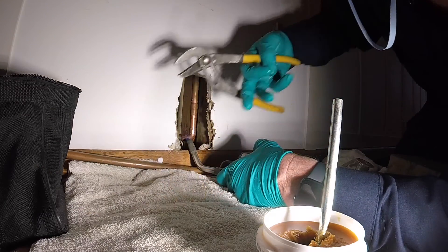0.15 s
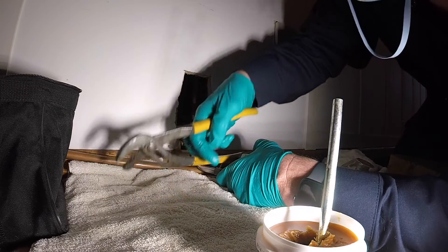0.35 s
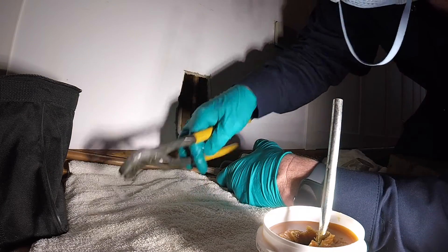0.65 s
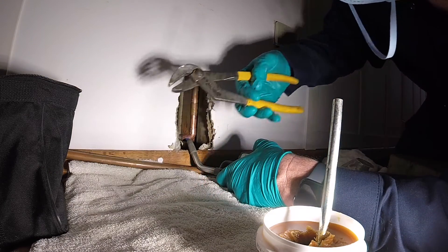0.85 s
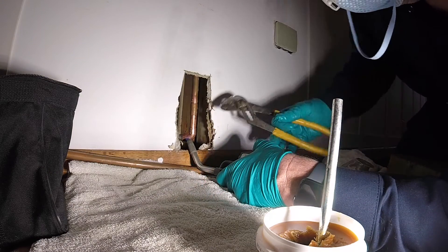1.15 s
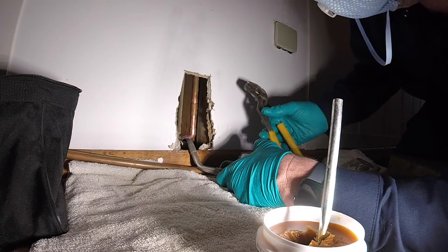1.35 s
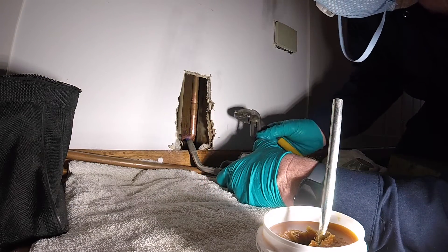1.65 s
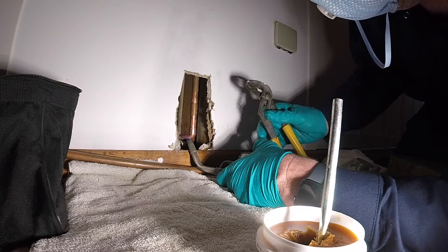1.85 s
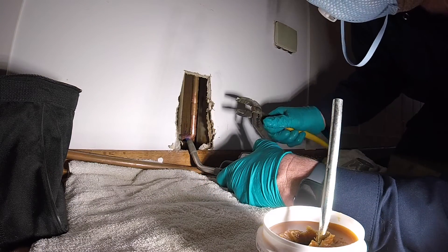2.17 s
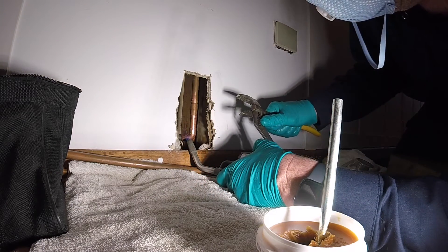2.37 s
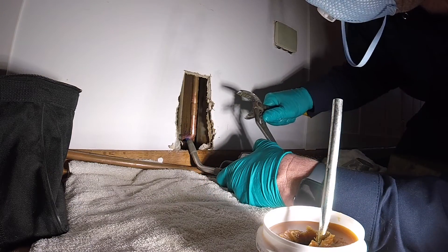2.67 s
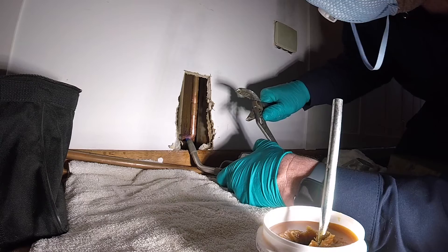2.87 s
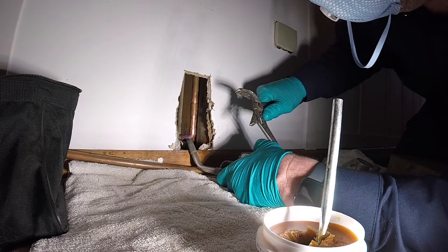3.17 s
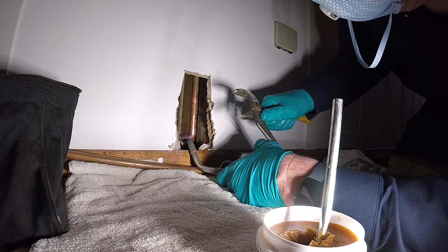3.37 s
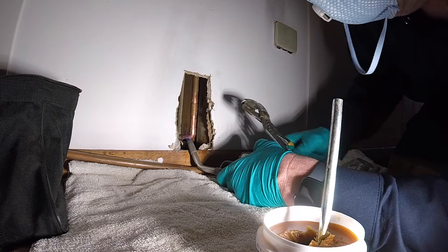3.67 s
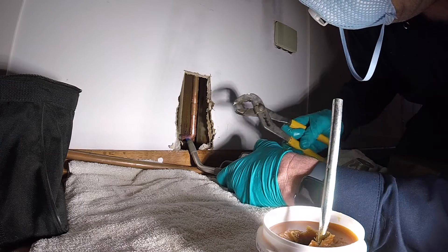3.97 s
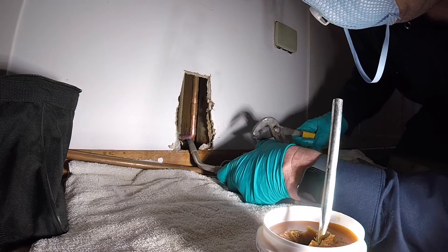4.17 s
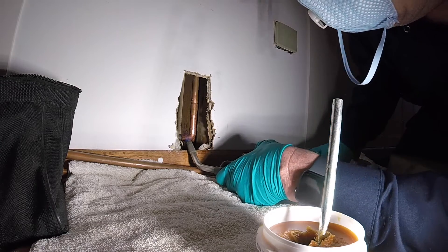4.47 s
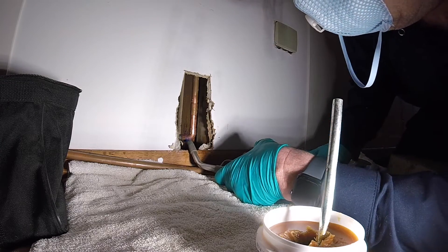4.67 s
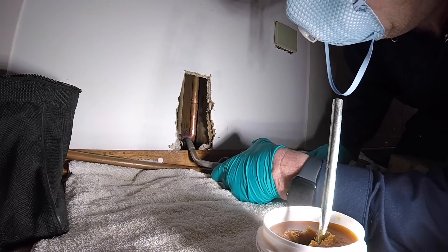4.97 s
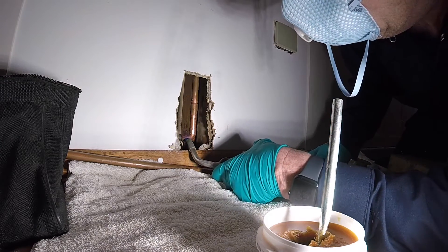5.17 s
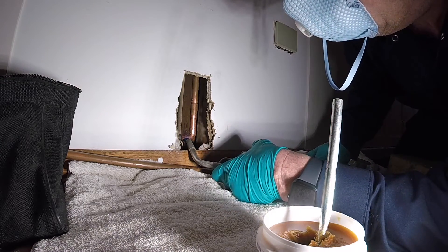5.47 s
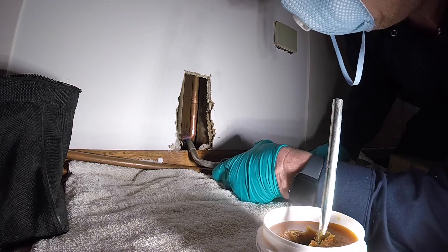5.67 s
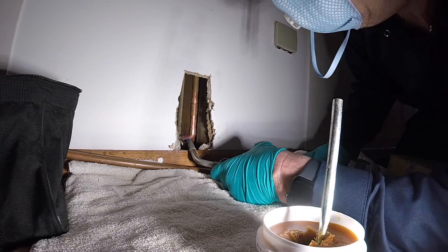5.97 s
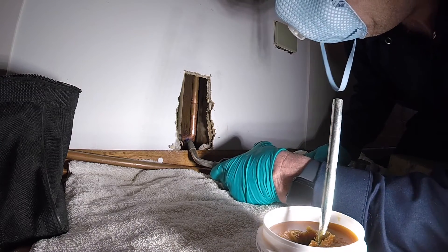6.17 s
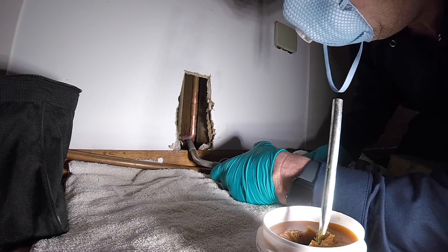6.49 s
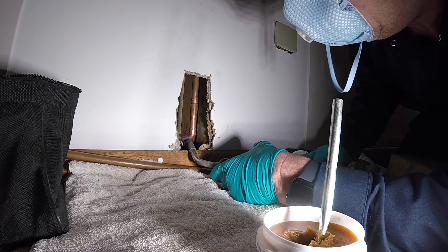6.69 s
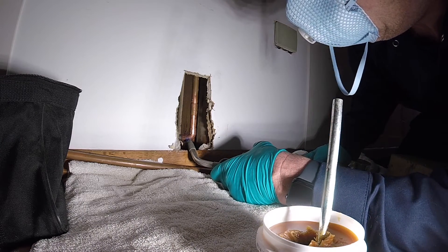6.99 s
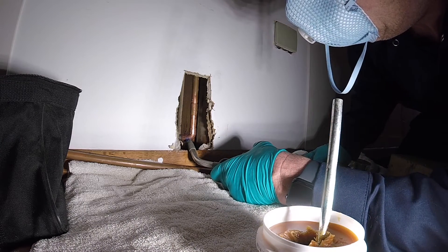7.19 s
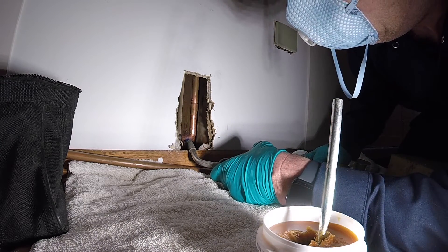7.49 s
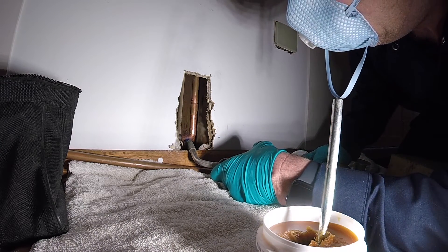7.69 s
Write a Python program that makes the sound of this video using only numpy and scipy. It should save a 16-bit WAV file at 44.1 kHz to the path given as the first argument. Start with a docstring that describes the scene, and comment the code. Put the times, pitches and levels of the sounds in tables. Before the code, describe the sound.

Close in a small room, a shop vacuum runs without pause: low tank roar, hoarse wavering motor whine and sputtering hiss of air and water entering the hose. Almost at once pliers knock the wall with a loud hollow thud and clack, then a softer bump. Later comes a light steel click and a faint thud. Past the middle the whine and hiss change colour as the worker leans in, with faint breathy air whistles.

```python
"""A shop vacuum runs steadily and sucks water from an open pipe in a wall.
Shaped noise makes the tank's roar, the hose's hiss and breathy whistles; noise and wavering tones make the whine.
A worker knocks with pliers, clicks their jaws and leans in, which changes the colour of whine and hiss.
Thuds are decaying sines, the clack is noise bursts with a room tail, the clicks are ringing steel modes."""
import sys
import numpy as np
from scipy import signal
from scipy.fft import rfft, irfft, next_fast_len
from scipy.io import wavfile
from scipy.ndimage import map_coordinates

SR = 44100
rng = np.random.default_rng(int(sys.argv[2]) if len(sys.argv) > 2 else 0)


def file_out(sig):
    """Save sig as 16-bit WAV at sys.argv[1]."""
    # one column per channel
    cols = np.atleast_2d(sig).T
    # limit, then scale
    lim = np.clip(cols, -1, 1)
    pcm = np.round(lim * 32767).astype(np.int16)
    wavfile.write(sys.argv[1], SR, pcm)


N = 345744
TIME_S = np.arange(N) / SR
TOP_HZ = 15200
DRIFT_DB, DRIFT_KNOTS_PER_S = 0.24, 2.99  # slow chance swings of the suction

# Worker's posture. Each row: time in seconds, lean from 0 (upright) to 1 (leaning in).
LEAN_POINTS = [(0, 0), (.45, .45), (.8, 0.085), (4.55, 0.11), (4.85, 0.95), (7.84, 0.9)]
# An arm crosses before the nozzle. Each row: time in seconds, cover from 0 to 1.
ARM_COVER_POINTS = [(0, 0.1), (.33, 0.3), (.48, 0.6), (.62, 0.6), (.76, 0.13), (7.84, 0)]
# The arm's filter on the hiss. Each row: frequency in Hz, gain in dB.
ARM_RESPONSE = [(1200, 2), (1800, 5), (3000, -3), (3650, 9.5), (4400, -2), (5400, -11), (6700, -5),
                (7400, 1), (11000, 0)]
# Small room's decay. Each row: frequency in Hz, t60 in seconds.
ROOM_T60 = [(150, 0.27), (500, 0.3), (2000, 0.25), (10000, 0.092)]
# A hand or tool bumps the wall and floor. Each row: start in seconds, relative level in dB, pitch in Hz.
THUD_EVENTS = [(.2300, -6, 281), (0.4798, -12.5, 364), (3.546, -15, 277)]
# The steel jaws chatter. Each row: start in seconds, relative level in dB.
CLACK_EVENTS = [(0.2302, -16), (0.2361, -17), (0.239, -19)]
# Colour of steel jaws meeting. Each row: frequency in Hz, relative density in dB per Hz.
CLACK_SPECTRUM = [(200, -1), (470, 10), (1200, 1.5), (2000, -6), (2600, 1), (3300, -7), (3700, -2),
                  (4400, -10), (5150, 0), (6500, -5), (8500, -16), (10000, -9), (11800, -29), (15000, -26)]
# Light touches on the pliers. Each row: time in seconds, relative level in dB.
CLICK_EVENTS = [(1.9212, -30), (5.52, -46), (5.84, -50)]
# Ringing modes of the pliers. Each row: frequency in Hz, relative level in dB, t60 in seconds.
STEEL_MODES = [(7300, 5, .05), (8360, -6, .14), (8570, -6, .08), (9120, -2, 0.12), (9421, -9, .06),
               (11400, -18, .05), (12600, -20, .05)]
# Colour of a click's tick. Each row: frequency in Hz, relative density in dB per Hz.
TICK_SPECTRUM = [(3000, -30), (6700, 3), (9200, -2), (10500, -15), (15000, -26)]
# Breathy whistles at the nozzle. Each row: start and end in seconds, start and end pitch in Hz,
# bandwidth in Hz, level ahead of the duct in dB.
WHISTLE_BANDS = [(4.65, 7.9, 9990, 9800, 280, -64), (5.7, 7.9, 9930, 9800, 180, -68),
                 (5.95, 7.9, 9080, 9220, 350, -62.5), (4.7, 7.9, 10280, 10260, 220, -71),
                 (0.79, 7.9, 9150, 9150, 420, -66), (4.65, 5.9, 9150, 9150, 380, -66),
                 (4.9, 5.4, 5150, 5130, 120, -46.5)]
# Motor's fan. Each row: frequency in Hz, relative density in dB per Hz.
WHINE_SPECTRUM = [(400, -104.9), (620, -74.5), (740, -67), (800, -64.5), (900, -62.5), (1080, -70.0),
                  (1190, -86), (1600, -117.0)]
# Resonances of motor housing and exhaust. Each row: centre in Hz, width in Hz, dB upright, dB leaning.
HOUSING_MODES = [(791, 37, 4.5, 6.5), (866, 30, 1, 11.5), (921.5, 83, 12.5, 9), (1058.5, 94, 11.5, 12),
                 (1128, 54, -0.5, 9.5), (1506, 54, 10.5, 8.5), (1597, 33, 8.5, 4.5), (1690, 79, 9, 4),
                 (1738, 28, 8.5, 7), (1887, 29, 11.5, 11), (1947, 50, 9, 8), (2055, 39, 7, 10),
                 (2282, 264, 9.5, 5)]
# Wavering tones in the whine. Each row: pitch in Hz, waver in Hz, relative dB upright, relative dB leaning.
WHINE_TONES = [(921, 17, -7.5, -18.5), (1488, 5.1, -26.5, -24), (1895, 9, -31, -28)]
# Air in the tank. Each row: frequency in Hz, relative density in dB per Hz.
ROAR_SPECTRUM = [(20, -96.7), (50, -91), (80, -88.5), (110, -84), (135, -68), (155, -43.5), (175, -46.5),
                 (215, -52.5), (265, -48.5), (320, -55.5), (380, -52), (470, -60.5), (600, -71),
                 (1000, -112.0)]
# Air rushing into the hose. Each row: frequency in Hz, relative density in dB per Hz.
HISS_SPECTRUM = [(700, -106.7), (1200, -73.5), (1700, -79), (2300, -76), (2600, -84), (4200, -81.5),
                 (5000, -79), (6300, -75.5), (7000, -86.5), (8500, -91), (10500, -94), (11500, -105.2),
                 (14000, -107.9), (15000, -123.8)]
# Resonances and notches of the nozzle before the wall. Each row: centre in Hz, width in Hz,
# dB upright, dB leaning.
NOZZLE_MODES = [(2500, 55, 4, -3), (2713, 94, 4.5, -1.5), (2810, 222, 11, 12), (3080, 170, 7.5, 10.5),
                (3304, 51, 8.5, -9.6), (3350, 180, -2, 7), (3683, 200, 7, 2), (3790, 67, -8, 0),
                (4184, 72, 6, 6.5), (4797, 310, 9.5, 5.5), (5120, 240, 3.5, 9), (5350, 121, 2, -3.5),
                (5534, 370, 7, 7), (5710, 160, -7.5, -3), (6130, 170, 5.5, -0.5), (6510, 140, 5.5, 0),
                (7430, 130, 4.5, 4), (7800, 66, -1.1, 4), (8340, 131, 4.3, -5), (9460, 171, -3.2, -2)]
# Slugs of water entering the hose. Each row: time in seconds, relative level in dB.
SLURP_EVENTS = [(.635, -35), (2.89, -30), (4.598, -35), (5.65, -34)]
# Standing waves between vacuum and wall. Each row: centre in Hz, width in Hz, gain in dB.
DUCT_MODES = [(585, 19.5, -8.5), (608, 26, 5), (635, 26, -3.5), (1180, 28, .5), (1295, 17, -2.5),
              (1366, 21, -4), (1440, 27, -2), (1618, 26, 3), (1680, 28, 3), (1815, 28, 7.5),
              (1846, 22, -4.5), (1995, 24, -4), (2086, 20, -5.5)]
# Flow levels ahead of the duct. Each: dB upright, change in dB when leaning, change in dB behind the arm.
ROAR_LEVELS_DB = (-26.5, 0.53, -1)
WHINE_LEVELS_DB = (-26.5, -3.5, -3)
HISS_LEVELS_DB = (-34, -1, -1.6)
SPRAY_LEVELS_DB = (-55, 0.3, -6)


def amp(db):
    """Gain of a level in dB."""
    return 10 ** (np.asarray(db) / 20)


def unit(x):
    """x at rms 1."""
    return x / np.sqrt(np.mean(x ** 2) + 1e-20)


def along(points, hz):
    """(Hz, value) points read on a log frequency axis."""
    point_hz, values = np.transpose(points)
    return np.interp(np.log(hz + 1), np.log(point_hz + 1), values)


def curve(points):
    """(seconds, value) points as one value per sample, held to 0-1."""
    point_s, values = np.transpose(points)
    return np.clip(np.interp(TIME_S, point_s, values), 0, 1)


def wobble(knots_per_s):
    """A smooth random curve through normal knots."""
    knots = rng.standard_normal(int(N * knots_per_s / SR) + 4)
    return map_coordinates(knots, [TIME_S * knots_per_s])


def filtered(x, response):
    """x times a zero-phase response of frequency."""
    size = next_fast_len(N + SR // 2)
    spectrum = rfft(x, size) * response(np.fft.rfftfreq(size, 1 / SR))
    return irfft(spectrum, size)[:N]


def noise(spectrum):
    """Noise of rms 1 with the given colour."""
    return unit(filtered(rng.standard_normal(N), lambda hz: amp(along(spectrum, hz))))


def burst(start_s, attack_s, t60_s):
    """An envelope that rises at start_s and dies away, floored 120 dB down."""
    age_s = np.maximum(TIME_S - start_s, 0)
    decay = amp(-60 * np.minimum(age_s / t60_s, 2))
    return (1 - np.exp(-age_s / attack_s)) * decay


def bells(hz, centre_hz, width_hz):
    """Shapes of resonances, one column each, 1 at the centre."""
    return 1 / (1 + (2 * (hz[:, None] - centre_hz) / width_hz) ** 2)


def resonate(x, modes):
    """x through resonances, crossfaded by posture between two versions of rms 1."""
    lean = curve(LEAN_POINTS)
    centre_hz, width_hz, *postures_db = np.transpose(modes)
    upright, leaning = [unit(filtered(x, lambda hz: amp(bells(hz, centre_hz, width_hz) @ db)))
                        for db in postures_db]
    return (1 - lean) * upright + lean * leaning


def level(upright_db, leaning_db, covered_db):
    """A steady level in dB, shifted by the worker's body and arm, with a slight drift."""
    shift_db = leaning_db * curve(LEAN_POINTS) + covered_db * curve(ARM_COVER_POINTS)
    return upright_db + shift_db + DRIFT_DB * wobble(DRIFT_KNOTS_PER_S)


def room(x):
    """The small room's tail: noise in which each frequency dies at its own speed."""
    hz, t_s, bins = signal.stft(rng.standard_normal(SR // 2), SR, nperseg=256)
    decay = amp(-60 * t_s / along(ROOM_T60, hz)[:, None])
    tail = signal.istft(bins * decay, SR, nperseg=256)[1]
    return signal.fftconvolve(x, tail / np.linalg.norm(tail))[:N]


def reflected(x, echo_db, far_s, count=12):
    """Wall, floor and body send back weak early copies that ripple the spectrum."""
    delays_s = rng.uniform(far_s / 10, far_s, count)
    signs = rng.choice([-1, 1], count)
    taps = np.bincount(np.round(delays_s * SR).astype(int), signs / np.sqrt(count))
    return x + amp(echo_db) * signal.fftconvolve(x, taps)[:N]


def thuds(rise_s=0.0042, boom_hz=161, boom_db=-11, boom_t60_s=0.54):
    """Each bump is a short swelling sine; the wall panel booms on after it."""
    out = np.zeros(N)
    for start_s, db, hz in THUD_EVENTS:
        age_s = np.maximum(TIME_S - start_s, 0)
        swell = (age_s / rise_s * np.exp(1 - age_s / rise_s)) ** 2
        push = swell * np.sin(2 * np.pi * hz * age_s)
        boom_envelope = amp(boom_db) * burst(start_s, attack_s=0.013, t60_s=boom_t60_s)
        boom = boom_envelope * np.sin(2 * np.pi * boom_hz * age_s)
        out += amp(db) * (push + boom)
    return out


def knocks(clack_t60_s=0.028, room_db=-9, low_hz=130):
    """Hollow thuds, and the noisy clack of the pliers, which the room scatters."""
    envelope = sum(amp(db) * burst(start_s, attack_s=0.00025, t60_s=clack_t60_s)
                   for start_s, db in CLACK_EVENTS)
    clack = noise(CLACK_SPECTRUM) * envelope
    # the knocks carry almost nothing below low_hz
    low_cut = signal.butter(5, low_hz, "highpass", fs=SR, output="sos")
    return signal.sosfilt(low_cut, thuds() + clack + amp(room_db) * room(clack))


def clicks(tick_db=3, ring_db=-11):
    """A light touch ticks as a noise burst and leaves the pliers' steel modes ringing thinly."""
    touches = np.zeros(N)
    for touch_s, db in CLICK_EVENTS:
        touches[round(touch_s * SR)] = amp(db)
    ring = np.zeros(N)
    for hz, db, t60_s in STEEL_MODES:
        ring += amp(db + ring_db) * burst(0, attack_s=.0005, t60_s=t60_s) * np.sin(2 * np.pi * hz * TIME_S)
    tick = amp(tick_db) * burst(0, attack_s=.002, t60_s=.02) * noise(TICK_SPECTRUM)
    return signal.fftconvolve(touches, ring + tick)[:N]


def whistles(fade_s=0.19, waver_db=1):
    """Narrow bands of air noise come and go and drift as the nozzle shifts."""
    out = np.zeros(N)
    for start_s, end_s, start_hz, end_hz, width_hz, db in WHISTLE_BANDS:
        band = unit(filtered(rng.standard_normal(N), lambda hz: 1 / (1 + (2 * hz / width_hz) ** 4)))
        pitch_hz = np.interp(TIME_S, [start_s, end_s], [start_hz, end_hz])
        carrier = np.sin(2 * np.pi * np.cumsum(pitch_hz) / SR)
        gate = np.clip(np.minimum(TIME_S - start_s, end_s - TIME_S) / fade_s + .5, 0, 1)
        out += amp(db + waver_db * wobble(2.92)) * gate * unit(band * carrier)
    return out


def hose(level_db, spray_db, sputter_db=0.3, spit_db=0.64, split_hz=7200):
    """Air hisses into the nozzle; random flutter gives droplets' sputter, bursts give slurping slugs."""
    modes = list(HOUSING_MODES) + list(NOZZLE_MODES)
    air = reflected(resonate(noise(HISS_SPECTRUM), modes), echo_db=-13.5, far_s=.008)
    cover = curve(ARM_COVER_POINTS)
    behind_arm = filtered(air, lambda hz: amp(along(ARM_RESPONSE, hz)))
    air = (1 - cover) * air + cover * behind_arm
    spray = filtered(air, lambda hz: 1 - 1 / (1 + (hz / split_hz) ** 16))  # above split_hz
    sputter = amp(sputter_db * wobble(30) + spit_db * wobble(260))
    slugs = sum(amp(db) * burst(slurp_s - .002, attack_s=0.0014, t60_s=0.033)
                for slurp_s, db in SLURP_EVENTS)
    rush = (amp(level_db) + slugs) * unit(air - spray)
    return sputter * (rush + amp(spray_db) * unit(spray))


def motor(level_db, flutter_db=0.75, swell_db=3):
    """Fan noise drives narrow housing resonances: a hoarse whine with a few wavering tones in it."""
    lean = curve(LEAN_POINTS)
    whine = amp(flutter_db * wobble(19)) * resonate(noise(WHINE_SPECTRUM), HOUSING_MODES)
    for hz, waver_hz, upright_db, leaning_db in WHINE_TONES:
        phase = 2 * np.pi * np.cumsum(hz + waver_hz * wobble(25)) / SR
        tone = unit(amp(swell_db * wobble(20)) * np.sin(phase))
        whine += amp(upright_db + lean * (leaning_db - upright_db)) * tone
    return amp(level_db) * whine


def tank(level_db, throb_db=0.78):
    """Turbulent air booms in the tank; a random throb stands for the passing water."""
    return amp(level_db + throb_db * wobble(14)) * noise(ROAR_SPECTRUM)


def duct(x):
    """Standing waves between vacuum and wall lift and dip narrow bands."""
    centre_hz, width_hz, db = np.transpose(DUCT_MODES)
    return filtered(x, lambda hz: amp(bells(hz, centre_hz, width_hz) @ db))


def vacuum():
    """Tank, motor, hose and whistles, coloured by the standing waves."""
    roar = tank(level(*ROAR_LEVELS_DB))
    whine = motor(level(*WHINE_LEVELS_DB))
    hiss = hose(level(*HISS_LEVELS_DB), level(*SPRAY_LEVELS_DB))
    return duct(roar + whine + hiss + whistles())


def scene():
    """The vacuum with the pliers close by, one channel."""
    return (knocks() + clicks() + vacuum())[None]


def record(dry):
    """Nothing passes from TOP_HZ up."""
    return filtered(dry[0], lambda hz: hz < TOP_HZ)[None]


dry = scene()
out = record(dry)
file_out(out)
```